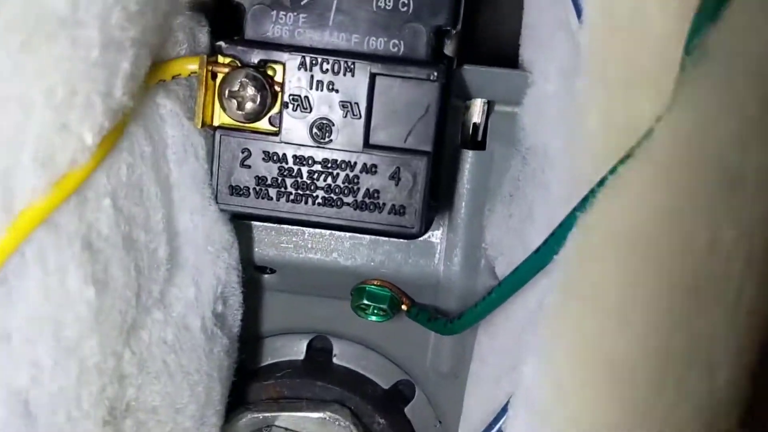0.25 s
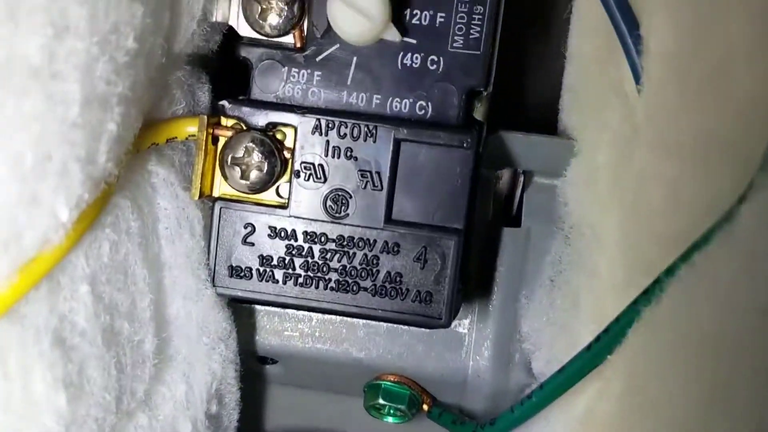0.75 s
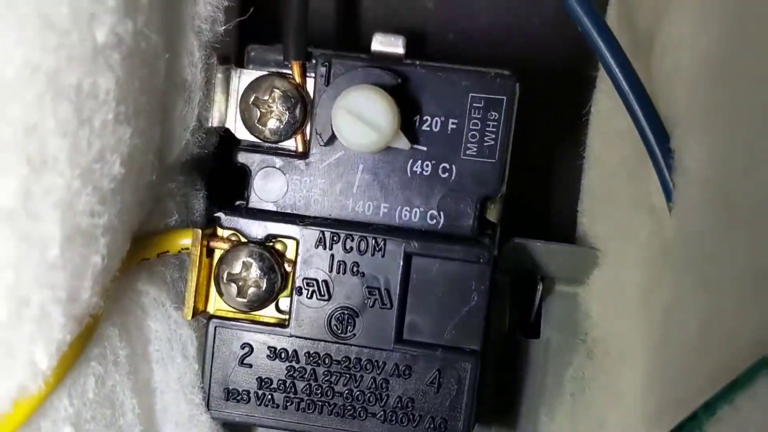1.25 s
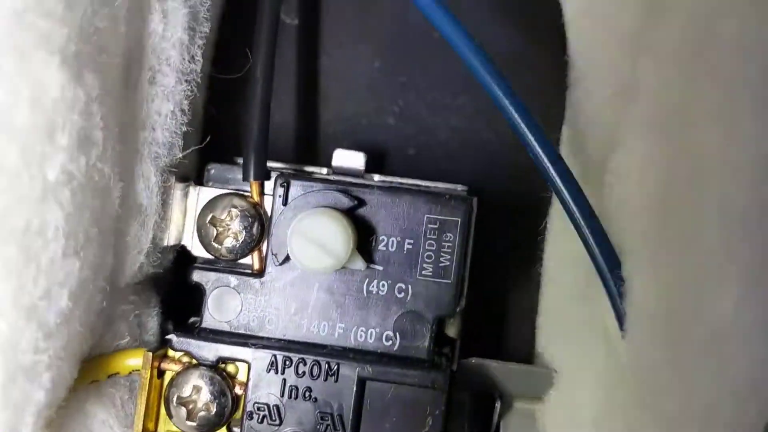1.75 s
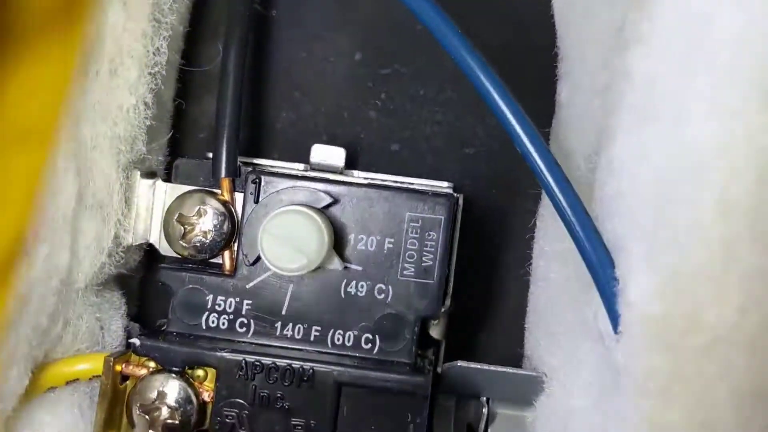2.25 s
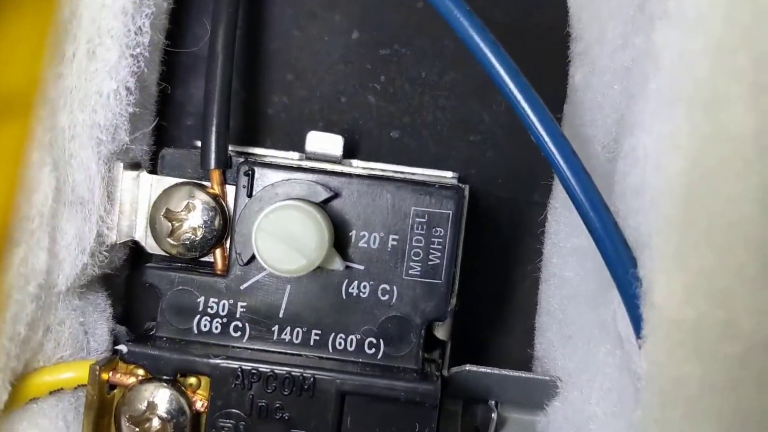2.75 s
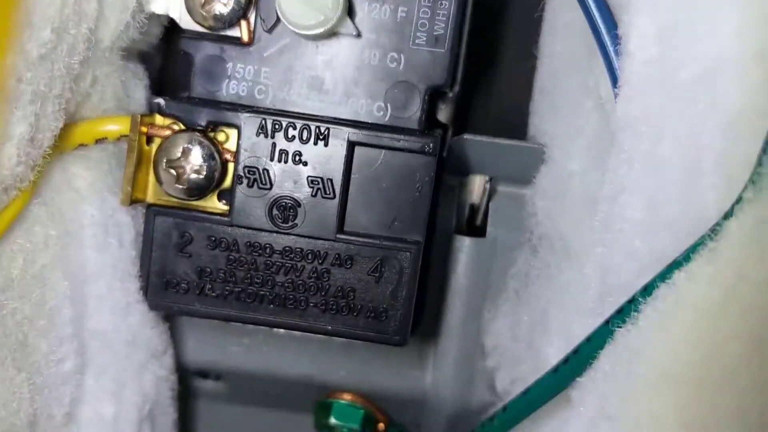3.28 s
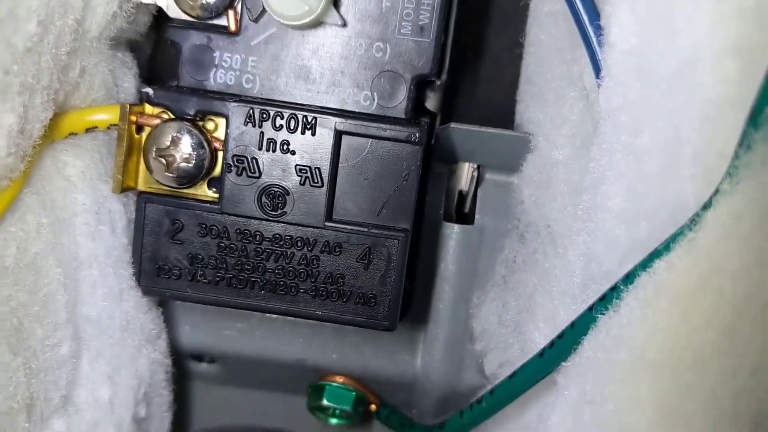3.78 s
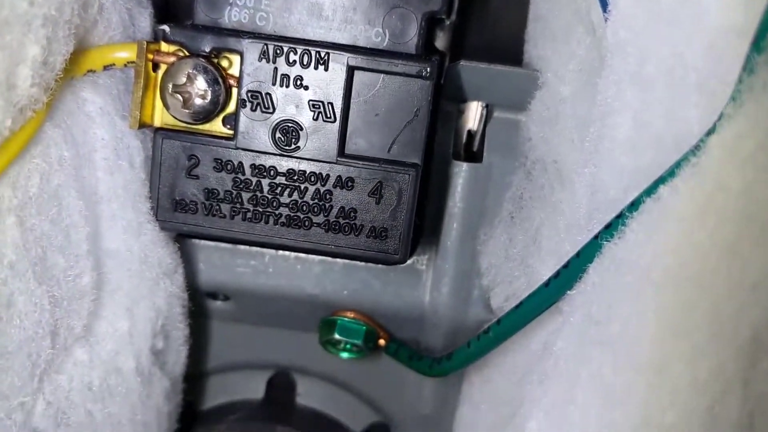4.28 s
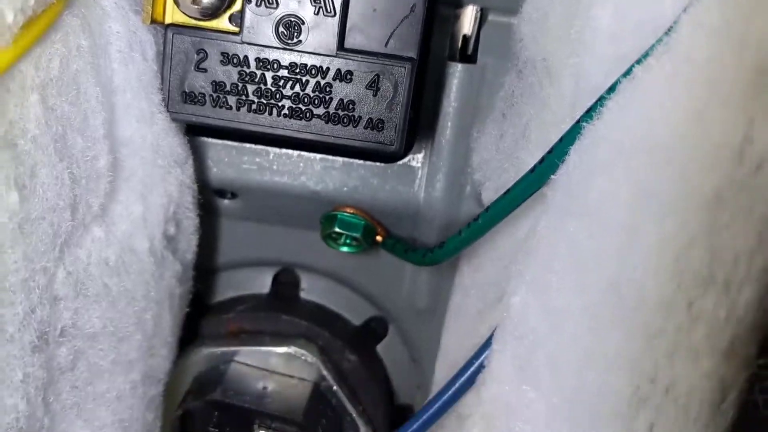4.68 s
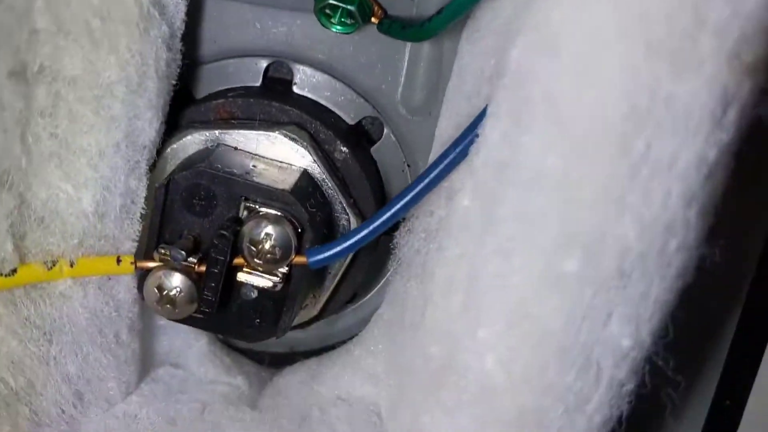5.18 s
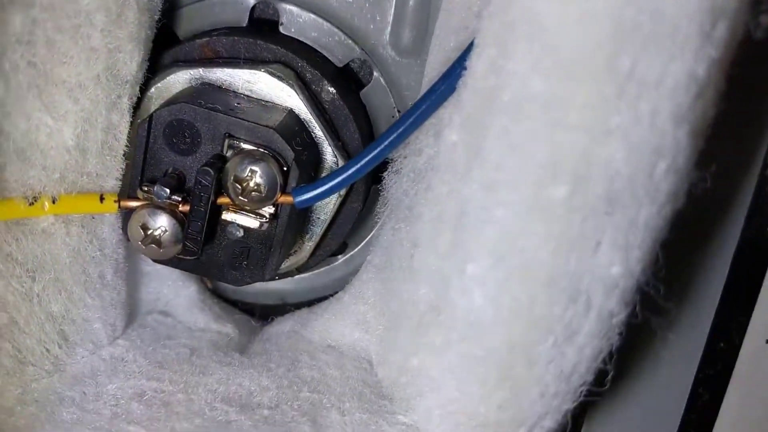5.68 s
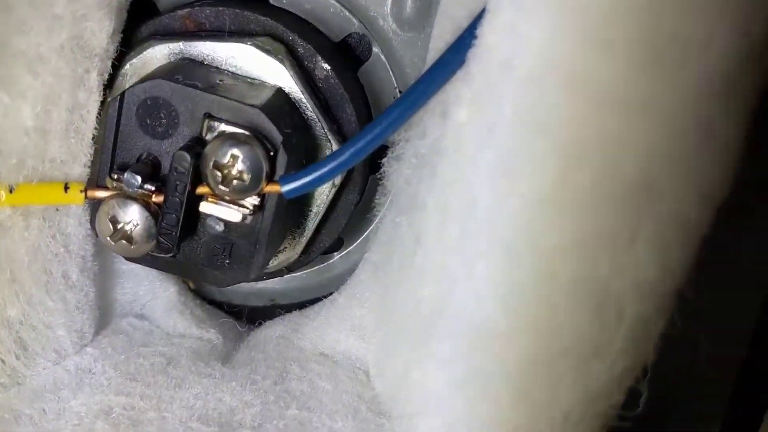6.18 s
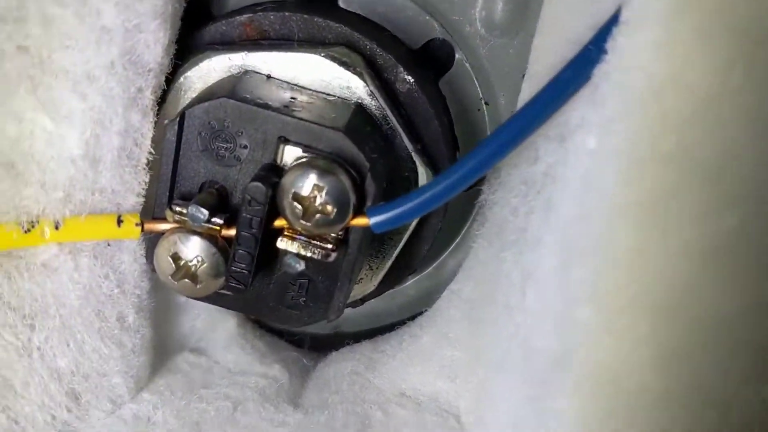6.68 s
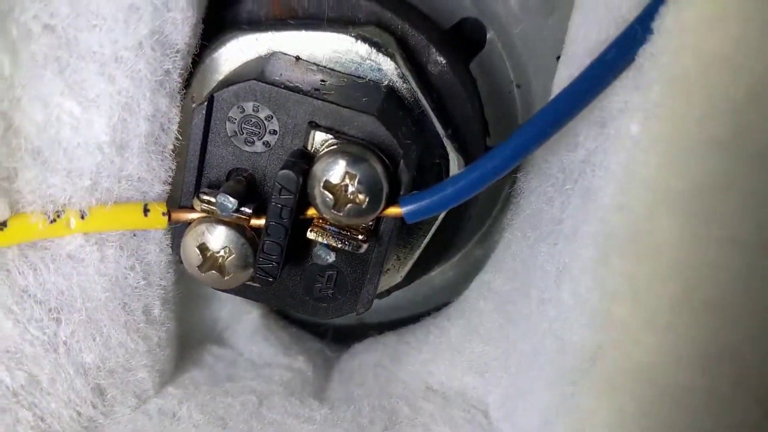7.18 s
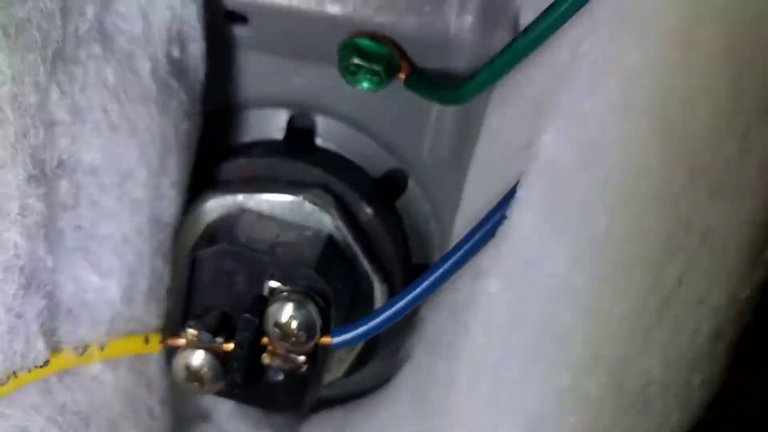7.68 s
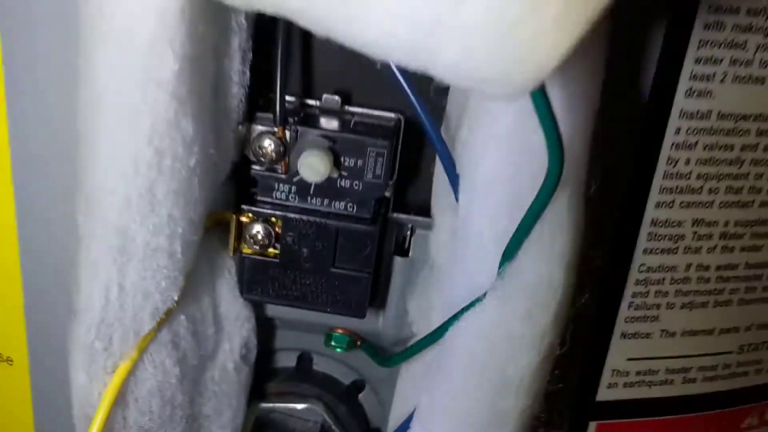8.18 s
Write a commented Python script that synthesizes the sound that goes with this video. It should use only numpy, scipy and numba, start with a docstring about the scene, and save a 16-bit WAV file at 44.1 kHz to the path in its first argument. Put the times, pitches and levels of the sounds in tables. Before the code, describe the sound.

Close handheld microphone by a water heater: motor hum and rushing air, a finger scrapes and thumps the microphone, sound ducks, then the rumble gradually returns.

```python
"""Indoors, a handheld microphone faces the open side of a water heater, close to its surfaces.
From the start, noise in low resonances and wavering tones make rumble and hum, throbbing under filtered air noise.
Just after 2 s a finger hisses along the case and shuts the port: a chirped puff, a thump and small ticks.
The gain control ducks at once; the rumble creeps back over several seconds while the finger hovers
by the port, rings it faintly and strokes the case once more at about 4 s."""
import sys
import numpy as np
from scipy import signal
from scipy.fft import rfft, irfft, next_fast_len
from scipy.io import wavfile
from scipy.ndimage import uniform_filter1d
from numba import njit

SR = 44100
rng = np.random.default_rng(int(sys.argv[2]) if len(sys.argv) > 2 else 0)


def materialize(psi):
    """Save the field psi as 16-bit PCM at rate SR to the path in sys.argv[1].

    A 1-D psi becomes a single channel; in a 2-D psi each row is a channel.
    """
    bounded = np.clip(np.atleast_2d(psi).T, -1, 1)
    quanta = np.round(bounded * 32767).astype(np.int16)
    wavfile.write(sys.argv[1], SR, quanta)


N = 372644
FFT_SIZE = next_fast_len(N, True)
TIME = np.arange(N) / SR
FREQS = np.fft.rfftfreq(FFT_SIZE, 1 / SR)

# low resonances driven by the machinery's air flow, levels relative to each other and to the hum:
# (frequency [Hz], width [Hz], level [dB rms])
RUMBLE_RESONANCES = [(54.6, 9.7, -44), (87.2, 8.6, -34.5), (119.5, 25, -26.5), (147, 51, -31.5),
                     (171.8, 28.5, -40), (205.7, 4.9, -44)]
# motor hum (first row, level relative to the rumble), then panel tones:
# (frequency [Hz], level [dB rms], pitch waver [Hz rms], flutter [dB rms])
HUM_AND_PANEL_TONES = [(120.3, -27.5, 1.5, 2.8), (257.8, -44.3, .8, 2.8), (355, -52.5, 3.5, 4),
                       (482, -54.5, 3.5, 4), (842, -51.3, .6, 2)]
# level of the rumble and hum, louder in some spots as the microphone moves: (time [s], level [dB])
LOUDNESS_ALONG_PATH = [(0, -24.5), (.9, -23.5), (1.15, -27.5), (1.6, -27.5), (2.0, -26.5), (2.7, -26),
                       (4.5, -24.5), (7.3, -24), (8.45, -26)]
# the beat of two motors at nearly the same speed, and random surges
BEAT_HZ, BEAT_CREST_S, BEAT_DB = 2.74, .134, 1.5
SURGE_DB, SURGE_RATE_HZ = 1.04, 2.3

# air puffs: leak, hiss through the last gap, puff of the closure:
# (peak time [s], level [dB], rise [s], fall [s])
PORT_PUFFS = [(2.25, -38.5, .035, .03), (2.271, -20, 0.0066, 0.013), (2.283, 3, 0.0022, 0.0084)]
# relative colour of air squeezed through the port: (frequency [Hz], level [dB per Hz])
SQUEEZED_AIR_COLOUR = [(40, 5), (130, 7), (260, 7.5), (430, -1), (620, 10.5), (900, -2.5), (1500, -9),
                       (4000, -19), (7000, -14), (8500, -30), (16000, -32)]
# the port resonance falls as the finger narrows the gap, then rises again
SHUT_S, SHUT_LENGTH_S, OPEN_HZ, SHUT_HZ = 2.294, 0.023, 8100, 1440
PORT_DAMPING = .4

# strokes of skin on the case: (peak time [s], level [dB], rise [s], fall [s])
SKIN_STROKES = [(2.125, -48.5, .06, .03), (2.215, -41, 0.036, 0.091), (4.1, -50.5, 0.034, 0.15)]
# relative colour of skin rubbing the case: (frequency [Hz], level [dB per Hz])
SKIN_COLOUR = [(500, -20), (3000, 2), (7800, 7), (9000, 2), (12000, 1.5), (15500, -5)]
# skin peeling off the case and small ticks of the grip:
# (time [s], level [dB], frequency [Hz], width [Hz], decay [s])
GRIP_TICKS = [(2.289, -20, 2600, 3170, 0.014), (2.374, -28, 1800, 3600, 0.002),
              (2.452, -40, 7500, 2000, .004), (2.471, -35, 7250, 1800, .004),
              (3.984, -42, 12500, 5000, .0015)]
# the finger hovers by the port from just before the pop and shades one band of the air
HOVER_FROM_S, HOVER_TO_S, SHADOW_HZ, SHADOW_DB = 2.24, 4.08, 2480, 3

# relative colour of the rushing air: (frequency [Hz], level [dB per Hz])
AIR_COLOUR = [(20, -11), (70, 3), (200, 2.5), (290, -5.5), (400, -2), (620, -5), (750, -9), (1100, -10.5),
              (1400, -13.5), (1900, -13), (2250, -16.5), (5000, -21.5), (8200, -26), (10500, -34),
              (15500, -39.5)]
AIR_DB = -35.5
# hollow resonances of the air path, negative lifts being dips: (frequency [Hz], width [Hz], lift [dB])
DUCT_RESONANCES = [(357.5, 29, 4), (429, 26, -3.5), (444, 12, 3.5), (471, 20, 3), (520, 23, -2.5),
                   (593, 86, 1), (836, 60, 0), (938, 83, 5.5)]
# distance from microphone to nearest surface; its echo cancels a quarter wave: (time [s], gap [cm])
SURFACE_GAP = [(4.7, 0.31), (5.2, 0.9), (5.5, 1.8), (6.2, 1.7), (6.7, 0.94), (7.5, 0.77), (7.9, 2.6)]
SOUND_CM_PER_S = 34300
# hollows of the heater that the microphone passes, each lifting one band of the air:
# (start [s], end [s], frequency [Hz], lift [dB])
HEATER_HOLLOWS = [(-.2, 0.83, 1330, 2.2), (-.2, 2.4, 3000, 2.5), (4.3, 5.15, 4930, 1.5),
                  (5.2, 7.8, 2450, 2.5), (6.8, 7.85, 337, 2.8), (7.85, 8.3, 920, 3)]
EDGE_HZ = 15750  # upper band limit of the microphone chain


def machinery(waver_rate_hz=5, flutter_rate_hz=8):
    """Turbulence booms in a few low resonances, with wavering, fluttering motor and panel tones."""
    boom = sum(gain_of(db) * noise(bell(FREQS, hz, width)) for hz, width, db in RUMBLE_RESONANCES)
    tones = []
    for hz, db, waver_hz, flutter_db in HUM_AND_PANEL_TONES:
        pitch_hz = hz + waver_hz * noise(bell(FREQS, 0, waver_rate_hz))
        flutter = gain_of(flutter_db * noise(bell(FREQS, 0, flutter_rate_hz)))
        tone = flutter * np.sin(2 * np.pi * np.cumsum(pitch_hz) / SR)
        tones.append(gain_of(db) * evened(tone))
    hum, panel_tones = tones[0], sum(tones[1:])
    # hum and boom throb together; the panel tones keep their own level
    beat_db = BEAT_DB * np.cos(2 * np.pi * BEAT_HZ * (TIME - BEAT_CREST_S))
    surge_db = SURGE_DB * noise(bell(FREQS, 0, SURGE_RATE_HZ))
    level_db = follow(LOUDNESS_ALONG_PATH)[0] + beat_db + surge_db
    return gain_of(level_db) * steadied(boom + hum, 0.28) + panel_tones


def pop(snap=2.1, thump_s=2.29, thump_hz=100, thump_db=-4, thump_length_s=0.011):
    """The port shuts and reopens: its air resonance falls and rises fast, with a soft pressure thump."""
    closure = np.exp(-abs((TIME - SHUT_S) / SHUT_LENGTH_S) ** snap)
    port_hz = OPEN_HZ + (SHUT_HZ - OPEN_HZ) * closure
    tuning = np.tan(np.pi * np.clip(port_hz, 50, SR / 3) / SR)
    squeezed_air = noise(gain_of(read(SQUEEZED_AIR_COLOUR, FREQS)))
    puff = steadied(resonant_lowpass(squeezed_air, tuning, PORT_DAMPING), 0.0075)
    puff_envelope = sum(swell(*row) for row in PORT_PUFFS)
    t = TIME - thump_s
    thump = gain_of(thump_db) * np.cos(2 * np.pi * thump_hz * t) * np.exp(-(t / thump_length_s) ** 2)
    return puff_envelope * puff + thump


def finger(ring_hz=7900, ring_width_hz=380, ring_db=-59.5, graze_db=-58, settle_s=0.27, linger_s=0.48):
    """Skin hisses along the case, and the half-shaded port rings narrowly as the finger hovers."""
    # graze and ring start and end later than the shading of the air
    hover = during(TIME, HOVER_FROM_S + linger_s, HOVER_TO_S + linger_s, settle_s)
    rubbing = sum(swell(*stroke) for stroke in SKIN_STROKES) + gain_of(graze_db) * hover
    hiss = rubbing * noise(gain_of(read(SKIN_COLOUR, FREQS)))
    ring = gain_of(ring_db) * hover * noise(bell(FREQS, ring_hz, ring_width_hz))
    return hiss + ring


def ticks():
    """Peeling skin and a shifting grip give dry noise bursts, sudden at the onset and quick to decay."""
    total = 0
    for s, db, hz, width, decay in GRIP_TICKS:
        envelope = (TIME >= s) * np.exp(-abs(TIME - s) / decay)
        total = total + gain_of(db) * envelope * noise(bell(FREQS, hz, width))
    return total


def air(ripple_db=2.0, patchy_db=0.52):
    """Rushing air as spectral noise, coloured by the duct and the surfaces around the moving microphone."""
    frames, hz = N // 512 + 5, np.fft.rfftfreq(2048, 1 / SR)
    real, imaginary, patches, ripple = rng.standard_normal((4, frames, len(hz)))
    duct_db = sum(db * bell(hz, f, width) for f, width, db in DUCT_RESONANCES)
    colour_db = read(AIR_COLOUR, hz) + duct_db
    shade_db = surroundings(np.arange(frames)[:, None] * 512 / SR, hz)
    # standing waves ripple the treble and shift slowly as the microphone moves
    ripple = uniform_filter1d(uniform_filter1d(ripple, size=130, axis=0), size=4, axis=1)
    ripple = evened(ripple) * np.clip(hz / 3000, 0, 1)
    # quicker, broader patches of random level
    patches = evened(uniform_filter1d(uniform_filter1d(patches, size=5, axis=0), size=28, axis=1))
    total_db = colour_db + shade_db + ripple_db * ripple + patchy_db * patches
    spectrum = (real + 1j * imaginary) * gain_of(total_db)
    rush = signal.istft(spectrum.T, nperseg=2048, noverlap=1536)[1][:N]
    return gain_of(AIR_DB) * evened(rush)


def surroundings(t, hz, dip_db=2.5, dip_octaves=0.42, lift_octaves=0.32, move_s=0.065, loudness_share=.2):
    """Colour in dB: a near surface's echo and the finger cut bands of the air, hollows lift others."""
    echo_hz = SOUND_CM_PER_S / 4 / follow(SURFACE_GAP, t)[0]
    echo = dip_db * hump(hz, echo_hz, dip_octaves)
    hollows = sum(
        db * during(t, start, end, move_s) * hump(hz, f, lift_octaves)
        for start, end, f, db in HEATER_HOLLOWS
    )
    shadow = SHADOW_DB * during(t, HOVER_FROM_S, HOVER_TO_S, move_s) * hump(hz, SHADOW_HZ, dip_octaves)
    # the air follows a share of the rumble's loudness
    return loudness_share * follow(LOUDNESS_ALONG_PATH, t)[0] + hollows - echo - shadow


def gain_of(db):
    """Decibels to amplitude."""
    return 10 ** (np.asarray(db) / 20)


def evened(x):
    """Scales to rms 1."""
    return x / np.sqrt(np.mean(x ** 2) + 1e-20)


def steadied(x, seconds):
    """Holds the running rms near 1."""
    window = np.hanning(int(seconds * SR))
    energy = signal.fftconvolve(x ** 2, window, "same")
    weight = signal.fftconvolve(np.ones(N), window, "same")
    return x / np.sqrt(abs(energy / weight) + 1e-12)


def read(points, hz):
    """A spectrum in dB, joined on a log-frequency axis."""
    f, db = np.transpose(points)
    return np.interp(np.log(hz + 1), np.log(f + 1), db)


def follow(rows, t=TIME):
    """The columns of a curve at the times t."""
    s, *columns = np.transpose(rows)
    return [np.interp(t, s, c) for c in columns]


def noise(gain):
    """Noise of rms 1 with the given amplitude spectrum."""
    return evened(irfft(rfft(rng.standard_normal(FFT_SIZE)) * gain, FFT_SIZE)[:N])


def bell(hz, centre_hz, width_hz):
    """Amplitude response of a resonance with steep skirts, a quarter of its peak at one width away."""
    return 1 / (1 + ((hz - centre_hz) / width_hz) ** 2) ** 2


def hump(hz, centre_hz, octaves):
    """A broad, smooth band of height 1."""
    return np.exp(-.5 * (np.log2((hz + 1) / centre_hz) / octaves) ** 2)


def swell(s, db, rise, fall):
    """An envelope that grows to its peak at s and dies away."""
    return gain_of(db) * np.exp(-np.maximum((s - TIME) / rise, (TIME - s) / fall))


def during(t, start, end, fade_s):
    """About 1 between start and end, with soft edges."""
    return (np.tanh((t - start) / fade_s) - np.tanh((t - end) / fade_s)) / 2


@njit
def resonant_lowpass(x, tuning, damping):
    """A mass of air on a spring, retuned every sample."""
    out, speed, place = np.zeros(len(x)), 0.0, 0.0
    for i in range(len(x)):
        g = tuning[i]
        band = (speed + g * (x[i] - place)) / (1 + g * (g + damping))
        out[i] = place + g * band
        speed, place = 2 * band - speed, 2 * out[i] - place
    return out


def scene():
    """Everything that reaches the one microphone."""
    return (machinery() + pop() + finger() + ticks() + air())[None]


def record(dry, threshold_db=-13, deepest_db=-15, recovery_per_s=0.12, ceiling=0.32, low_cut_hz=42):
    """Microphone low cut; gain control that drops fast and climbs slowly; soft overload; band limit."""
    low_cut = signal.butter(2, low_cut_hz, "high", fs=SR, output="sos")
    heard = signal.sosfilt(low_cut, dry)
    power = abs(uniform_filter1d(heard[0] ** 2, size=260))
    level_db = 10 * np.log10(power + 1e-12)
    wanted = gain_of(np.clip(2 * (threshold_db - level_db), deepest_db, 0))
    climb = recovery_per_s * TIME  # gain regained, as a share of full gain
    gain = np.minimum.accumulate(wanted - climb) + climb
    ducked = heard * uniform_filter1d(gain, size=300)
    limited = ducked / (1 + (ducked / ceiling) ** 6) ** (1 / 6)
    band_limit = signal.firwin(511, EDGE_HZ, window=("kaiser", 9), fs=SR)
    return signal.oaconvolve(limited, band_limit[None], "same")


dry = scene()
out = record(dry)
materialize(out)
```